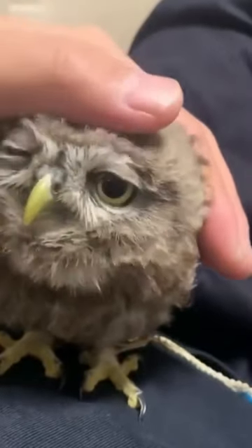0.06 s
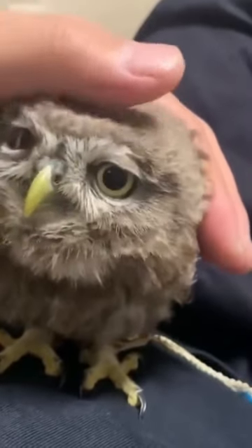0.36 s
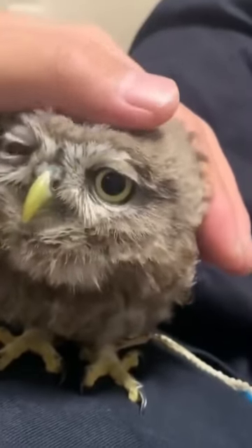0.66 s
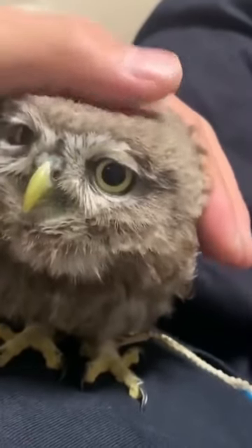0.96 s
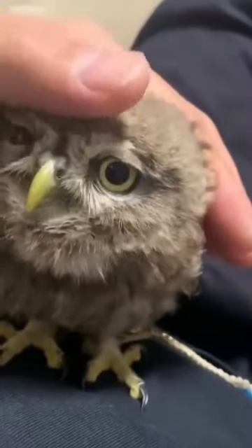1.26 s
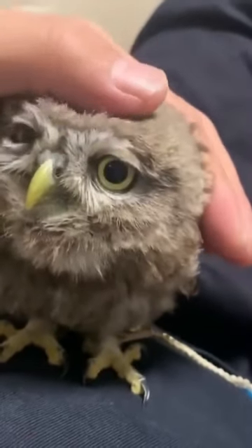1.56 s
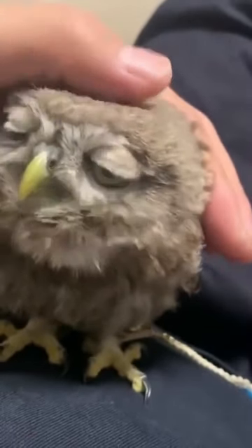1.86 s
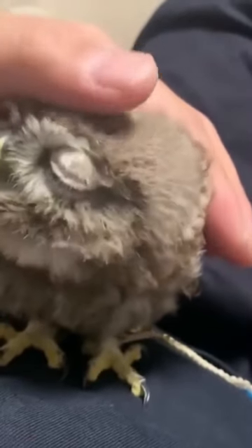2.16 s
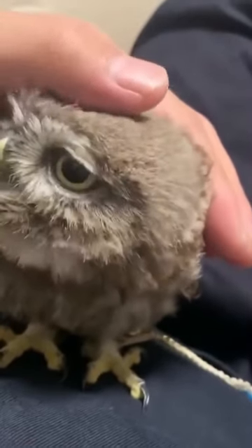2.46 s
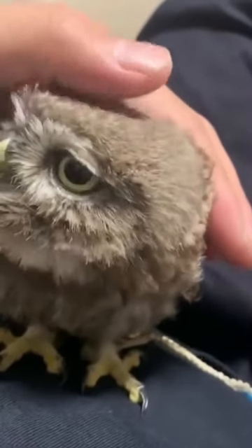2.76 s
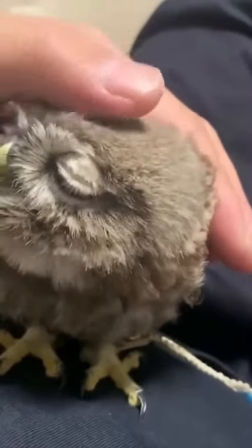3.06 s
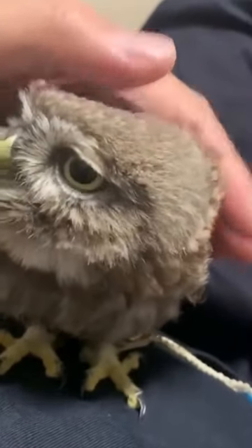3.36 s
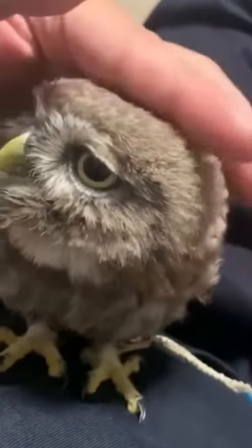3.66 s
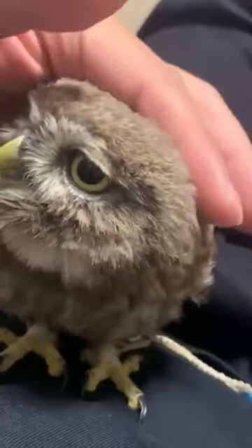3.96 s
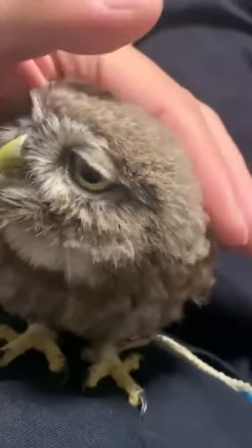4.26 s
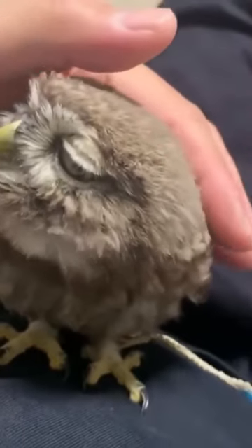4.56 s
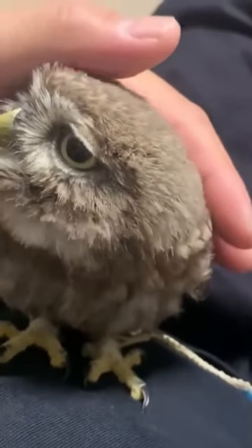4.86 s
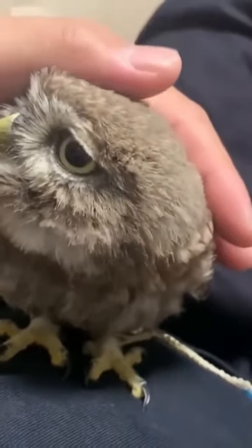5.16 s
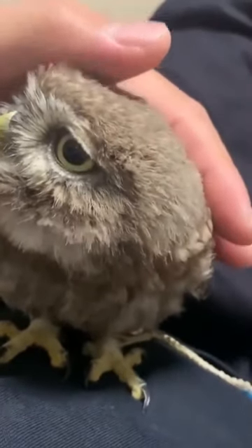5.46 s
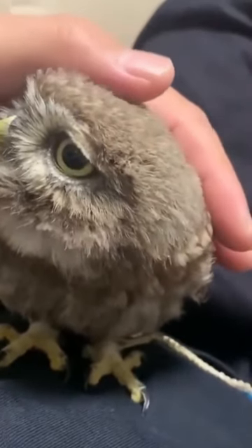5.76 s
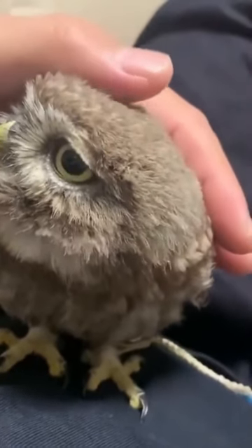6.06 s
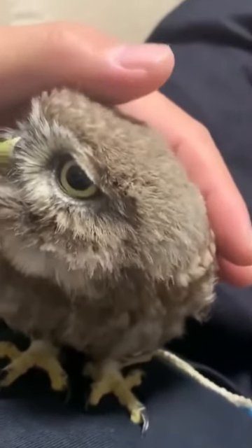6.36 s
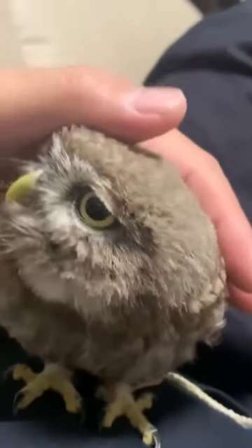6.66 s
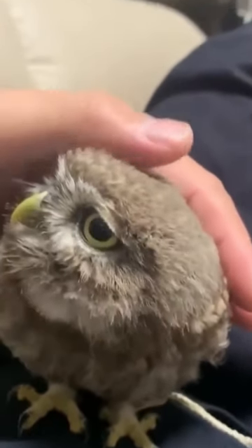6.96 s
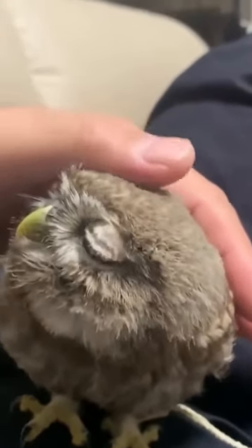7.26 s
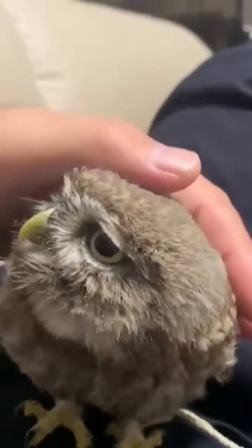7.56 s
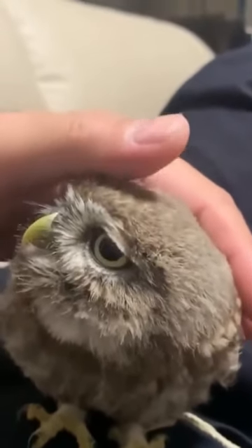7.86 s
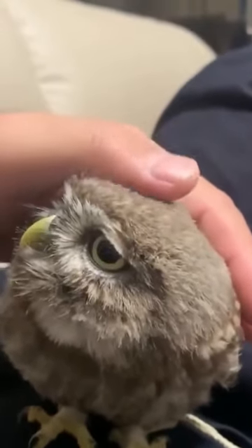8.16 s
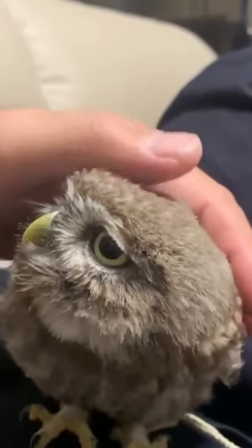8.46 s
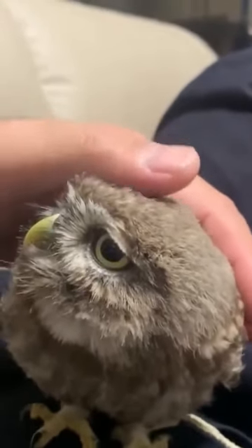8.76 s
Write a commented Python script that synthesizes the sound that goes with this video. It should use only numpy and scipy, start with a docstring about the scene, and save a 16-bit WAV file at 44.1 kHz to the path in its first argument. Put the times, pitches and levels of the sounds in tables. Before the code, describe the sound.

Short, raspy owlet chirps up close, with a far, echoing songbird, a few soft handling bumps and a steady low room hum.

```python
"""A young owl gives sharp, warbling chirps close by while it is stroked on a lap.
Each chirp is a puff of hiss and a high whistle, roughened by fluttering membranes and shaped by the beak.
Farther off, in a ringing space, a bird twice sings two brief notes, a hissing buzz and seven slurs
(whistles that slide down). There are also tiny near peeps, thin far whistles, soft bumps of the hand
and ticks of beak, claws and cloth. The room's ventilation hums low under it all."""
import sys
import numpy as np
from scipy import signal
from scipy.fft import rfft, irfft, next_fast_len
from scipy.io import wavfile
from scipy.ndimage import uniform_filter1d

SR = 44100
rng = np.random.default_rng(int(sys.argv[2]) if len(sys.argv) > 2 else 0)


def bounce(signal):
    """Save signal as a 16-bit WAV file at the path given by the first command-line argument."""
    frames = np.transpose(np.atleast_2d(signal))
    limited = np.clip(frames, -1, 1)
    pcm = np.round(limited * 32767).astype(np.int16)
    wavfile.write(sys.argv[1], SR, pcm)


N = 397341


def from_db(db):
    """Turn decibels into a number to multiply a sound by."""
    return 10 ** (np.asarray(db) / 20)


def at_hz(points, hz):
    """Read between the rows of a table, giving every octave equal room."""
    row_hz, value = np.transpose(points)
    return np.interp(np.log(np.maximum(hz, 1)), np.log(row_hz), value)


def drift(rate, size):
    """A random wobble, about 1 in size, that changes rate times a second."""
    knots = rng.standard_normal(size // 8 + 4)
    return np.interp(np.arange(size) * rate / SR, np.arange(len(knots)), knots) * np.sqrt(3 / 2)


def phase_of(hz):
    """How far a wave has turned as it follows a changing pitch."""
    return 2 * np.pi * np.cumsum(hz) / SR


def gate(t, length, rise, fall):
    """Fade in from time 0 and fade out by length."""
    fade_in = np.sin(np.pi / 2 * np.clip(t / rise, 0, 1))
    return fade_in * np.sin(np.pi / 2 * np.clip((length - t) / fall, 0, 1))


def add(track, s, sound):
    """Mix a sound in at s seconds."""
    at = round(s * SR)
    sound = sound[max(-at, 0):N - at]
    track[max(at, 0):max(at, 0) + len(sound)] += sound


def delayed(x, s):
    """The same sound, s seconds later."""
    return np.interp(np.arange(N) - s * SR, np.arange(N), x, left=0)


def reverb(x, t60, build_s):
    """Dense echoes, unrelated left and right, that build up and then fade 60 dB in t60 seconds."""
    t = np.arange(SR) / SR
    tail = rng.standard_normal((2, SR)) * from_db(-60 * t / t60) * (1 - np.exp(-t / build_s))
    tail /= np.sqrt(np.sum(tail ** 2, axis=1, keepdims=True))
    return signal.fftconvolve(x[None], tail, axes=1)[:, :N]


def wavering(hz, db, waver_db=2.5, wander_hz=1.523):
    """A tone that is never quite steady in level or pitch."""
    level = np.sqrt(2) * from_db(db + waver_db * drift(3, N))
    return level * np.sin(phase_of(hz + wander_hz * drift(8, N)))


# How alike left and right are. Each row: frequency in Hz, likeness (0 unrelated, 1 or more alike).
STEREO_LIKENESS = [(40, 1.3), (90, 0.55), (150, 0.44), (290, -0.01), (640, -0.19), (1400, -0.02), (4500, 0),
                   (7000, 0.74), (12000, 1.44)]
# Which side is louder. Each row: frequency in Hz, left minus right in dB.
STEREO_LEAN = [(40, 5), (125, 7), (250, -0.5), (1000, 0.5), (12000, 0)]


def room_noise(spectrum):
    """Noise from all around, most alike left and right in the deep bass and the high treble."""
    size = next_fast_len(N)
    hz = np.arange(size // 2 + 1) * SR / size
    mid, side = rfft(rng.standard_normal((2, size))) * from_db(at_hz(spectrum, hz))
    alike = np.clip(at_hz(STEREO_LIKENESS, hz), -1, 1)
    sign = np.array([[1], [-1]])
    pair = np.sqrt(1 + alike) * mid + sign * np.sqrt(1 - alike) * side
    out = irfft(pair * from_db(sign * at_hz(STEREO_LEAN, hz) / 2), size)[:, :N]
    return out / np.std(out.mean(axis=0))


# Three noises: rumble, rushing air and a deeper drone. Each row: frequency in Hz, relative level in dB.
RUMBLE_SPECTRUM = [(12, -62), (20, -34), (27, -42), (74, -17), (97, -12.5), (119, -7), (145, -4.5),
                   (177, -3.5), (193, -0.5), (225, -6), (255, -9.5), (282, -12.5), (400, -25), (520, -38),
                   (880, -120)]
AIR_SPECTRUM = [(180, -14), (300, 0), (666, -4), (813, -4), (1130, -8), (1720, -12), (2980, -17),
                (3400, -17), (4010, -17.5), (5410, -23), (6390, -24), (11100, -24.5), (16000, -31.5)]
DRONE_SPECTRUM = [(30, -34), (62, -20), (83, -7), (105, -6), (135, 8), (175, 5.5), (215, 0), (290, -30),
                  (800, -120)]
# The tones in the drone. Each row: pitch in Hz, relative level in dB.
DRONE_PITCHES = [(83, -15), (124, -2.5), (145, -7.5), (166, -1.5)]
# How the drone comes and goes. Each row: time in seconds, level in dB before drone_swing deepens the dips.
DRONE_SWELL = [(0, -44.2), (3.8, -40.5), (4.2, -33.4), (4.6, -40.4), (5.0, -38.9), (5.25, -28.7),
               (5.6, -29.8), (5.9, -36.4), (7.5, -40.6), (8.0, -34.5), (9.0, -35.9)]
# The fan's tones. Each row: pitch in Hz, level in dB at the start, level in dB at the end.
FAN_TONES = [(166.4, -49.5, -47.5), (181, -43.5, -53), (251.8, -53.5, -52), (418.7, -72, -54),
             (834, -66.5, -55)]


def ventilation(rumble_db=-38, air_db=-41, drone_noise_db=-7, drone_tones_db=-5.5, drone_swing=1.4):
    """The ventilation makes a low rumble, a soft rush of air, a swelling drone and a few fan tones."""
    rumble = from_db(rumble_db) * room_noise(RUMBLE_SPECTRUM)
    air = from_db(air_db) * room_noise(AIR_SPECTRUM)
    tones = sum(wavering(hz, db + drone_tones_db) for hz, db in DRONE_PITCHES) * from_db([[2], [-2]])
    drone = from_db(drone_noise_db) * room_noise(DRONE_SPECTRUM) + tones
    level_db = np.interp(np.arange(N) / SR, *np.transpose(DRONE_SWELL))
    swell = from_db(level_db.max() + drone_swing * (level_db - level_db.max()))
    fan = sum(wavering(hz, np.linspace(first, last, N)) for hz, first, last in FAN_TONES)
    return rumble + air + swell * drone + fan * from_db([[1], [-1]])


# Tiny peeps close by. Each row: start in seconds, level in dB.
NEAR_PEEPS = [(0.105, -50), (0.175, -56), (0.203, -53), (0.63, -50)]


def peeps(length_s=.0255, foot_hz=3500, top_hz=4450):
    """Barely voiced peeps that rise and fall in one little arch."""
    out, t = np.zeros(N), np.arange(SR // 20) / SR
    arch = np.sin(np.pi * np.clip(t / length_s, 0, 1))
    peep = np.sqrt(2) * arch * np.sin(phase_of(foot_hz + (top_hz - foot_hz) * arch))
    for s, db in NEAR_PEEPS:
        add(out, s, from_db(db) * peep)
    return out


def fluttering_whistle(length, start_hz, end_hz, db, depth_hz, growth_db, swell, flutter_hz=153.8):
    """A whistle whose pitch shakes quickly; a deep shake turns it into a hissing buzz."""
    t = np.arange(SR) / SR
    flutter = np.sin(phase_of(flutter_hz * (1 + .079 * drift(100, SR)))) + .4 * drift(700, SR)
    depth = depth_hz * np.interp(t, [0, length * .9], [.65, .85])
    hz = np.interp(t, [0, length], [start_hz, end_hz]) + depth * flutter
    level = from_db(np.interp(t, [0, length * .75], [db - growth_db, db]))
    return np.sqrt(2) * level * gate(t, length, swell * length, fall=.046) * np.sin(phase_of(hz))


# Thin whistles far off. Each row: start and length in seconds, first and last pitch in Hz,
# level in dB, rough depth of the flutter in Hz.
FAR_WHISTLES = [(0.262, .08, 6600, 7630, -47, 250), (0.27, .11, 5490, 6250, -51, 120),
                (1.56, 0.13, 4090, 3480, -41.5, 15), (3.68, .09, 4736, 4900, -38.5, 340),
                (3.815, .125, 3586, 3850, -43.5, 25), (6.368, .08, 6770, 7000, -52, 70)]


def far_whistles():
    """Short, stray whistles that each glide up or down."""
    out = np.zeros(N)
    for s, length, start_hz, end_hz, db, depth_hz in FAR_WHISTLES:
        add(out, s, fluttering_whistle(length, start_hz, end_hz, db, depth_hz, growth_db=0, swell=.2))
    return out


# The owl's chirps. Each row: start in seconds, level in dB, length in seconds, rough top pitch in Hz.
OWL_CHIRPS = [(0.683, -17.3, .060, 9400), (1.737, -15.6, .055, 9300), (2.912, -15.6, .062, 9450),
              (3.998, -17.6, .060, 9150), (4.82, -17.6, .056, 9400), (5.831, -17.5, .053, 8900),
              (8.229, -16.7, .068, 8900)]
# The warble every chirp follows. Each row: share of its length, share of its top pitch.
CHIRP_WARBLE = [(0, .58), (.18, .84), (.35, .98), (.52, .74), (.65, .93), (.79, .69), (1, .87)]
# What the beak lets through. Each row: frequency in Hz, gain in dB.
BEAK_FILTER = [(1200, -18.5), (3000, -11.5), (4500, -11), (5700, -6), (7300, -3.5), (8500, -3.5),
               (9500, -2), (11000, -10), (13000, -21), (15500, -28)]


def owl_chirps(jitter_hz=190, rasp_hz=1150, overtone_db=-15, shimmer_db=2.3, puff_db=-3.5):
    """Out of a puff of hiss a high whistle shoots up, twice drops and recovers, and leaves by the beak."""
    lead_s, attack_s, release_s = .015, .012, .008
    fade_db, crest_loss_db, fall_loss_db, puff_fade_db_per_s = 2, 2.5, 4, 310
    out, size = np.zeros(N), SR // 10
    t = np.arange(size) / SR - lead_s
    for s, db, length, top_hz in OWL_CHIRPS:
        progress = t / length + .0248 * drift(60, size)
        height = uniform_filter1d(np.interp(progress, *np.transpose(CHIRP_WARBLE)), size=60)
        phase = phase_of(top_hz * height + jitter_hz * drift(900, size))
        whistle = np.sin(phase) + from_db(overtone_db) * np.sin(2 * phase)
        # A fast flutter of the membranes adds tones above and below the whistle.
        depth = np.interp(progress, [.2, .5], [.35, .18])
        flutter = 1 + 2 * depth * np.sin(phase_of(rasp_hz * (1 + .265 * drift(712, size))))
        voice = np.sqrt(2) * whistle * flutter / np.sqrt(1 + 2 * depth ** 2)
        voice *= gate(t + attack_s / 2, length + (attack_s + release_s) / 2, attack_s, release_s)
        # The voice is weaker at its highest pitches and on the way down.
        crest = np.interp(height, [.85, 1], [0, 1])
        falling = uniform_filter1d(1.0 * (np.gradient(height) < -1e-9), size=100)
        loss_db = crest_loss_db * crest + fall_loss_db * falling + fade_db * progress
        voice *= from_db(shimmer_db * drift(408, size) - loss_db)
        hiss = signal.lfilter([1, -.45], 1, rng.standard_normal(size))  # brightened noise
        hiss *= gate(t + lead_s, lead_s + length + release_s, lead_s + attack_s / 2, release_s) ** 2
        hiss *= from_db(puff_db - puff_fade_db_per_s * np.maximum(t, 0))
        add(out, s - lead_s, from_db(db) * (voice + hiss))
    hz = np.linspace(0, SR / 2, 129)
    gains = from_db(2 * at_hz(BEAK_FILTER, hz))  # minimum_phase halves the dB again
    beak = signal.minimum_phase(signal.firwin2(257, hz, gains, fs=SR))
    return signal.lfilter(beak, 1, out)


def slur(hold_s, plunge_s, held_hz, held_db, plunge_db, held_rasp_hz, rasp_hz=210, accent_db=6):
    """A note swells on a held pitch, breaks and sags roughly, then snaps down with an accent."""
    size = SR // 6
    t = np.arange(size) / SR - hold_s
    fallen = t / plunge_s
    break_hz = 3950 + 110 * rng.standard_normal()
    hz = np.interp(fallen, [0, .25, .62, 1], [held_hz, break_hz, break_hz - 400, 2570])
    hz += 28 * drift(121, size)  # a slight waver
    hz += np.interp(fallen, [0, .3, 1], [held_rasp_hz, rasp_hz, rasp_hz / 2]) * drift(600, size)
    db = np.interp(fallen, [-.2, .05, .4, .65], [held_db, plunge_db, plunge_db, plunge_db + accent_db])
    edges = gate(t + hold_s, hold_s + plunge_s, rise=hold_s / 2, fall=.011)
    return np.sqrt(2) * from_db(db) * edges * np.sin(phase_of(hz))


# The far bird's songs. Each row: time of the run's first plunge and length of each plunge in seconds,
# the buzz's first and last pitch in Hz, the buzz's level in dB.
FAR_SONGS = [(1.681, .040, 5590, 5850, -33.5), (7.418, .046, 5900, 5770, -31.5)]


def far_songs(intro_lead_s=.895, intro_gap_s=.13, intro_hold_s=.026, buzz_lead_s=.68, buzz_s=.58):
    """A bird sings two rough notes, a growing buzz and a run of seven slurs that sink a little."""
    run_gap_s, run_hold_s, sag_hz_per_s, fade_db_per_s = .1374, .07, 150, 1
    out = np.zeros(N)
    for s, plunge_s, start_hz, end_hz, db in FAR_SONGS:
        for k in range(2):
            note = slur(intro_hold_s, plunge_s=.028, held_hz=4110, held_db=-41.5, plunge_db=-46.5,
                        held_rasp_hz=180)
            add(out, s - intro_lead_s + k * intro_gap_s - intro_hold_s, note)
        buzz = fluttering_whistle(buzz_s, start_hz, end_hz, db, depth_hz=480, growth_db=4, swell=.15)
        add(out, s - buzz_lead_s, buzz)
        for age in run_gap_s * np.arange(7):
            held_hz = 4800 - sag_hz_per_s * age + 28 * rng.standard_normal()
            held_db = -27.6 - fade_db_per_s * age
            note = slur(run_hold_s, plunge_s, held_hz, held_db, plunge_db=-32.7, held_rasp_hz=0)
            add(out, s + age - run_hold_s, note)
    return out


# Soft bumps of the hand, then small ticks of beak, claws and cloth.
# Each row: start in seconds, peak level in dB, middle frequency in Hz, seconds to fade by 60 dB.
HAND_BUMPS = [(1.96, -32, 80, 0.16), (2.235, -28.5, 91, .13), (5.695, -22.5, 115, 0.085)]
SMALL_TICKS = [(3.44, -38, 3600, .058), (4.72, -35.5, 2000, 0.035), (4.88, -36, 2215, .05),
               (5.065, -37, 3500, .09), (5.986, -24, 1300, 0.023), (8.767, -23, 4500, 0.0086)]


def touches(rows, spread):
    """Each touch is a short, dying puff of noise; more spread gives it a wider band of frequencies."""
    out, t = np.zeros(N), np.arange(SR // 4) / SR
    for s, db, hz, t60 in rows:
        band = signal.butter(2, [hz / spread, hz * spread], "band", fs=SR, output="sos")
        puff = signal.sosfilt(band, rng.standard_normal(len(t)) * from_db(-60 * t / t60))
        add(out, s, from_db(db) * puff / np.abs(puff).max())
    return out


# Paths by which the far bird arrives. Each row: delay in seconds, gain in dB, seconds to fade by 60 dB.
ECHO_PATHS = [(0.0, -2.5, 0.04), (0.048, -7, .07)]


def scene():
    """Near sounds arrive mostly direct; the far bird is heard almost wholly by its echoes."""
    near = owl_chirps() + peeps()
    lap = reverb(near, t60=.03, build_s=.0007)[0]
    room = reverb(near, t60=.34, build_s=.001)
    close = (near + from_db(-2) * lap + from_db(-6.5) * room[0]) * from_db([[-1.4], [1.3]])
    close += from_db(-15) * room[1] * [[1], [-1]]  # widens the room
    song = far_songs() + far_whistles()
    echoes = sum(from_db(db) * reverb(delayed(song, s), t60, build_s=.0015) for s, db, t60 in ECHO_PATHS)
    far = from_db(-8) * song + echoes + from_db(3) * reverb(song, t60=1.0, build_s=.0059)
    handling = touches(SMALL_TICKS, spread=1.47) + touches(HAND_BUMPS, spread=1.55)
    handling_echo = from_db(-1.5) * reverb(handling, t60=.27, build_s=.0025)
    return close + far + handling + handling_echo + ventilation()


def record(dry):
    """The highest treble, above 15900 Hz, is cut steeply."""
    return signal.sosfilt(signal.ellip(12, .1, 80, 15900, fs=SR, output="sos"), dry)


dry = scene()
out = record(dry)
bounce(out)
```